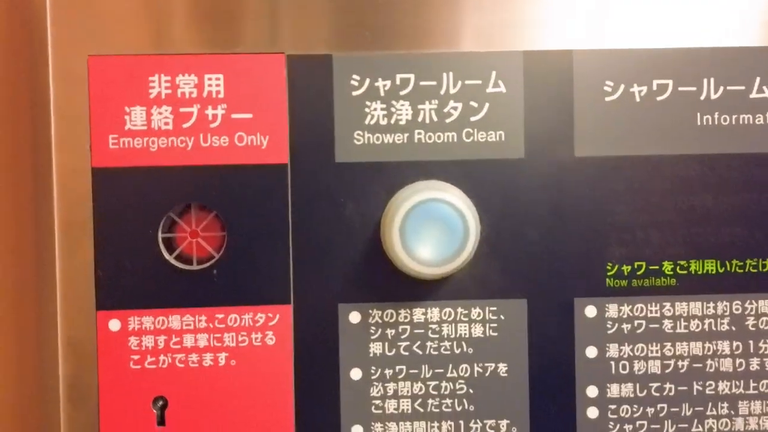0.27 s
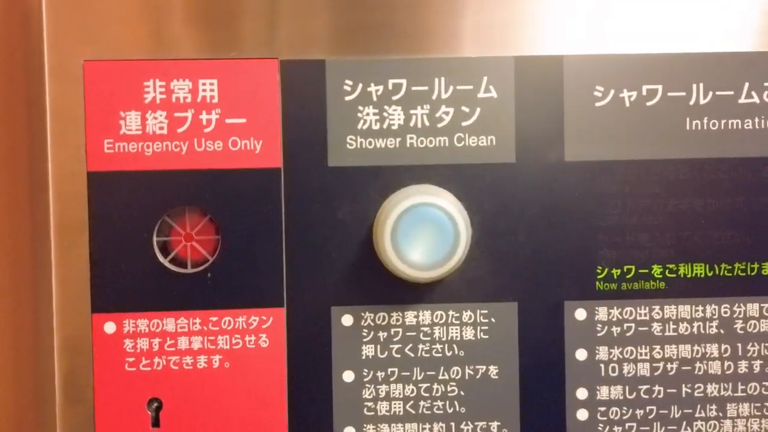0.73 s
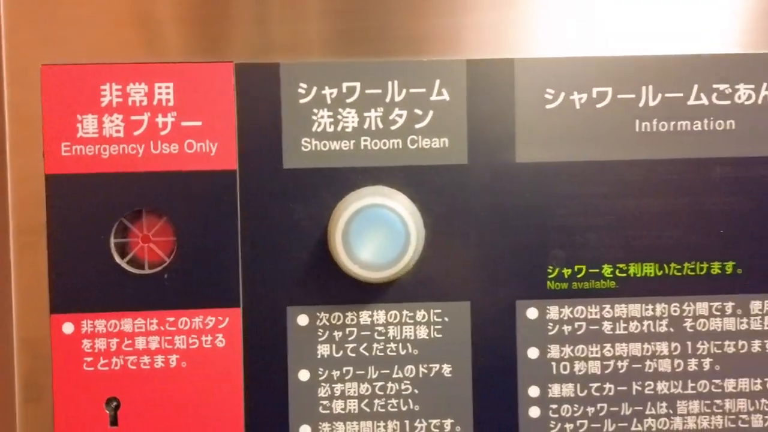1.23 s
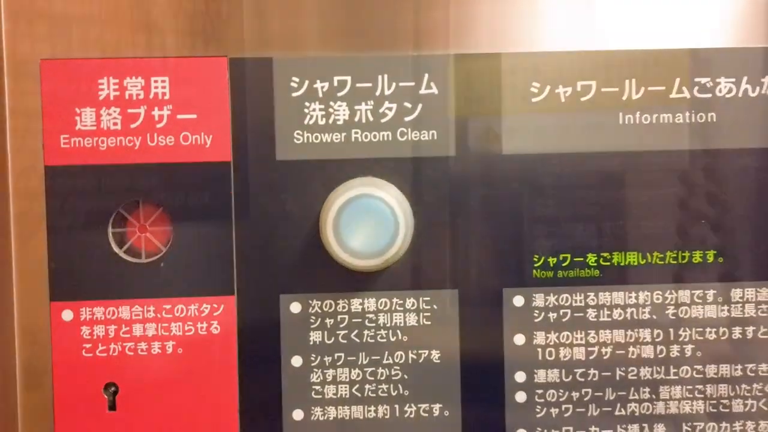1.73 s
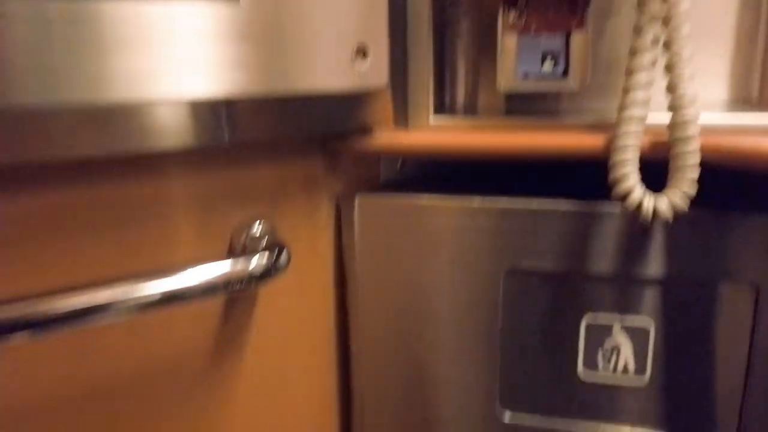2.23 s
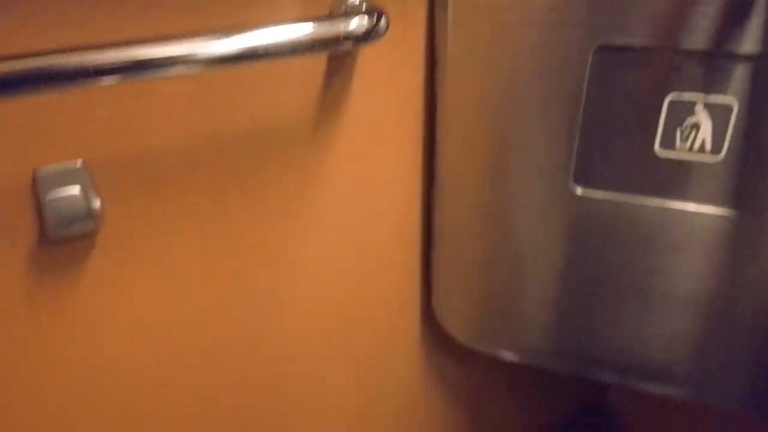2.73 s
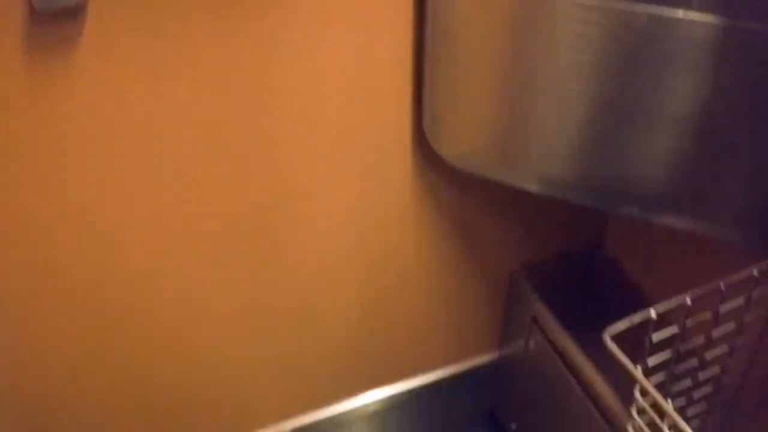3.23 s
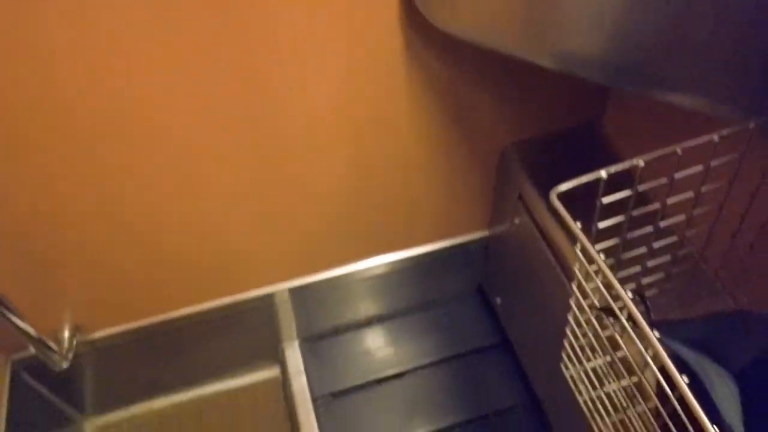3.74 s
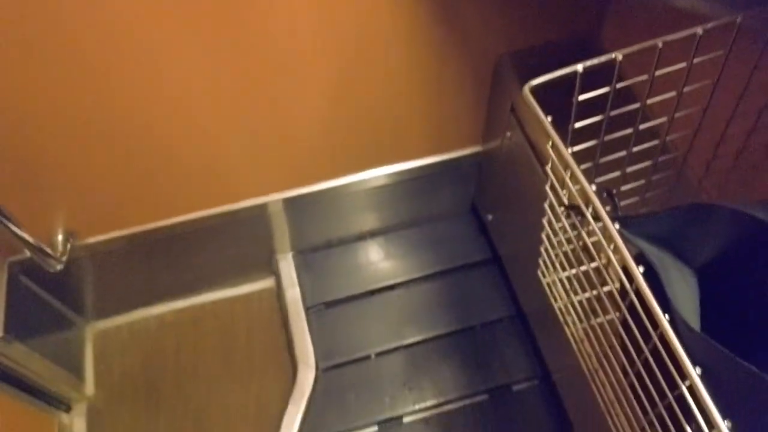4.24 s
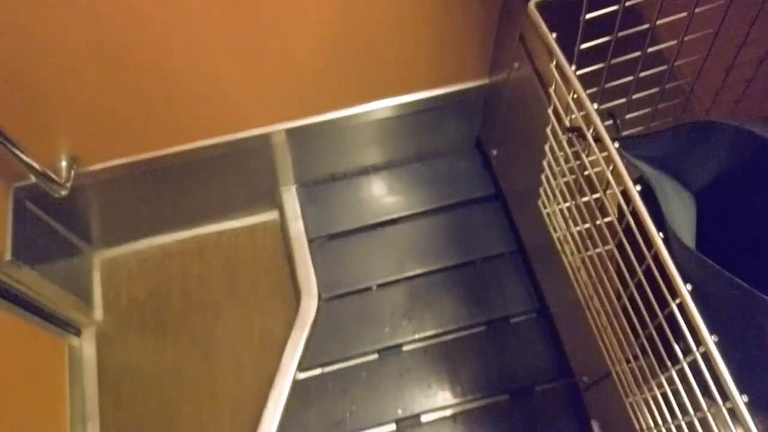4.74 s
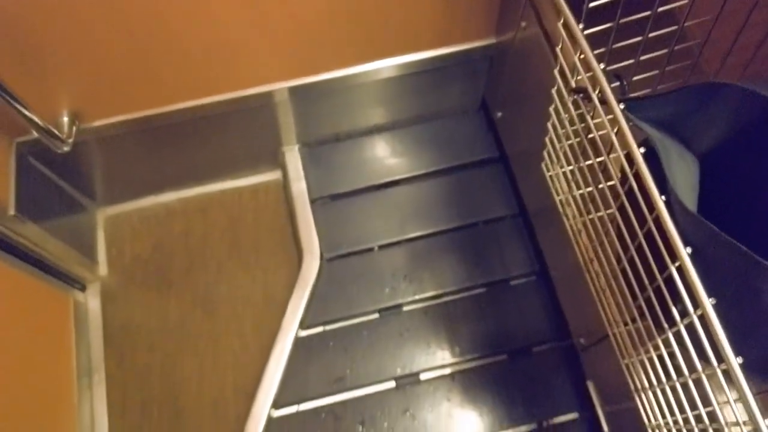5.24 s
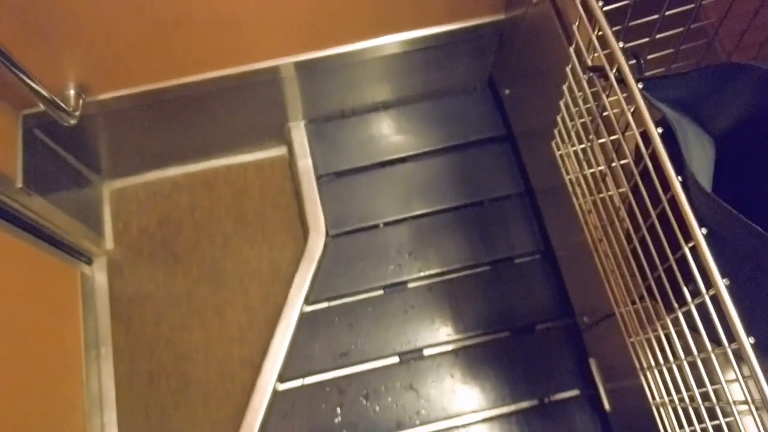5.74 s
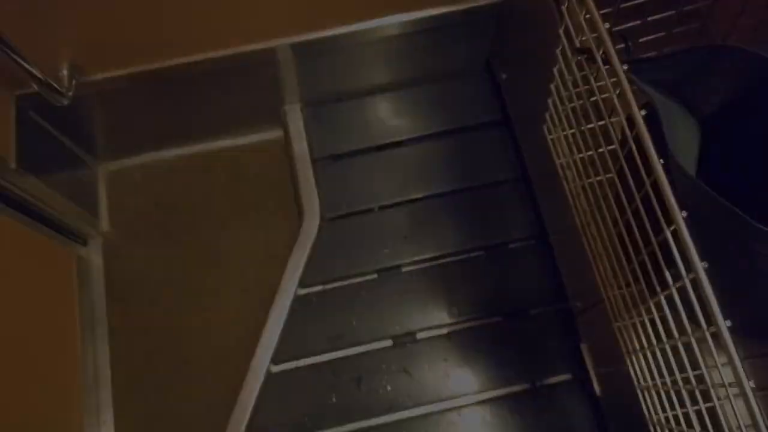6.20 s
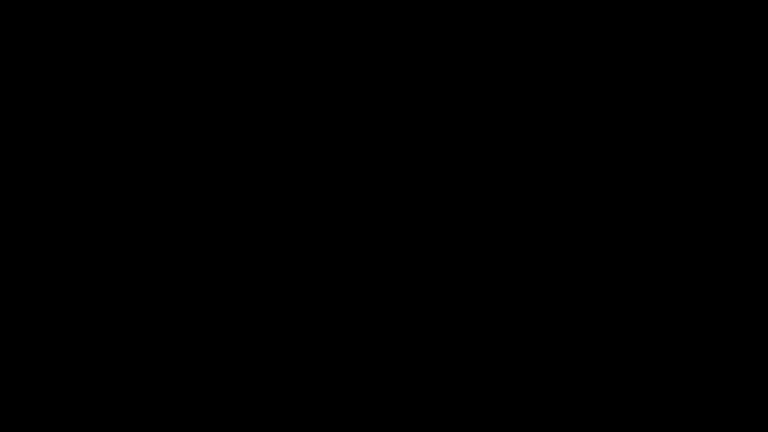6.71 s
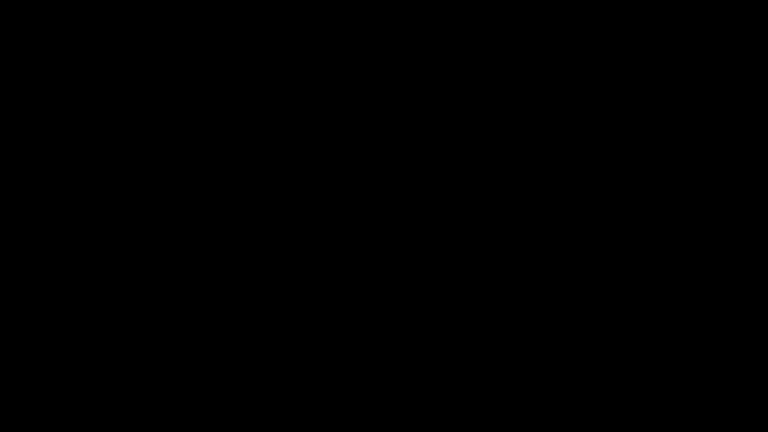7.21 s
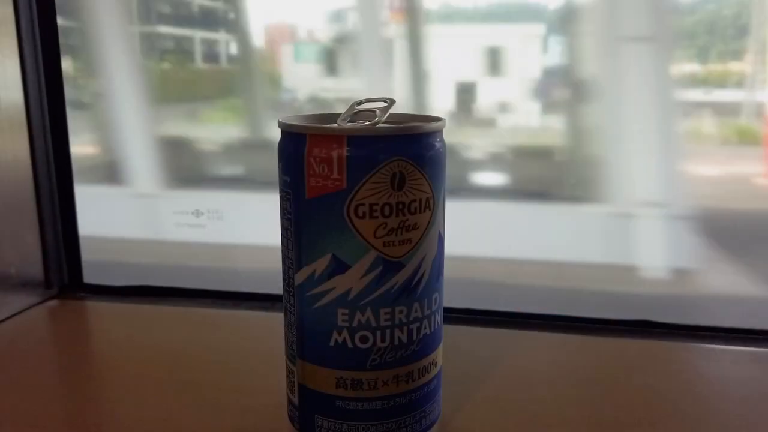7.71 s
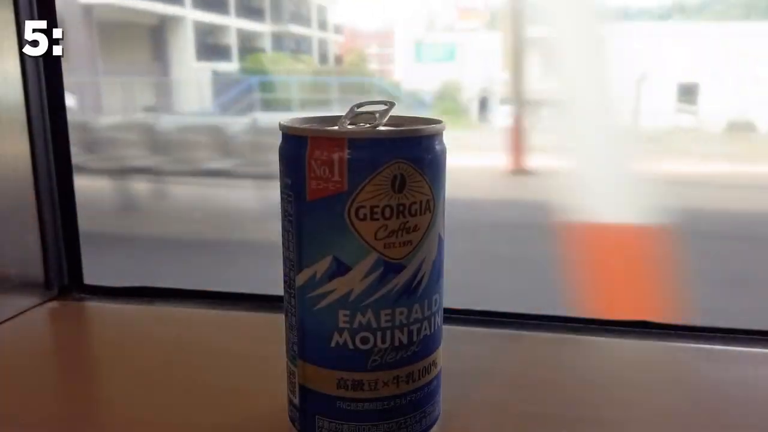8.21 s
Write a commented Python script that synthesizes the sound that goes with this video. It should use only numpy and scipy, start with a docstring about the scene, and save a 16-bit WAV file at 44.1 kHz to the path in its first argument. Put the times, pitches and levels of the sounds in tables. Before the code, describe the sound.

Shower jets hiss and splash over a train's rumble; after a silence, the train roars along while keyboard keys clack nearby.

```python
"""Jets hiss and drum behind a door over the carriage rumble: a train's shower room rinses itself. Then, from
the changing space, mist hisses and water splashes on the tray while the listener tilts down to the floor
grate; the spray fades out. After a silence the train runs on, heard from a window seat: wheels roar,
air rushes, the drive hums. A few keys clack on their stops close by, as on a keyboard."""
import sys
import numpy as np
from scipy import signal
from scipy.fft import rfft, irfft, next_fast_len
from scipy.io import wavfile
from scipy.ndimage import uniform_filter1d, map_coordinates

SR = 44100
rng = np.random.default_rng(int(sys.argv[2]) if len(sys.argv) > 2 else 0)


def to_wav(sig):
    """Store sig (one row per channel, or 1-D mono) as 16-bit WAV at the path in sys.argv[1].

    Samples outside -1..1 are clipped; the rate is SR.
    """
    pcm = np.clip(np.atleast_2d(sig), -1, 1) * 32767
    pcm = np.round(pcm).astype(np.int16)
    wavfile.write(sys.argv[1], SR, pcm.T)  # frames by channels


N = 373086
T = np.arange(N) / SR
DOOR_S, ROOM_S, RIDE_S = (0, 1.955), (1.955, 6.47), (7.2964, 9)
SIDE_SIGN = np.array([[1], [-1]])


def undb(db):
    """Decibels to gain."""
    return 10 ** (np.asarray(db) / 20)


def unit(x):
    """Scale to rms 1."""
    return x / np.sqrt(np.mean(x ** 2) + 1e-18)


def curves(table, t=T):
    """A table's columns, interpolated in time."""
    times, *columns = np.transpose(table)
    return [np.interp(t, times, column) for column in columns]


def during(span_s):
    """1 inside the span, with soft edges."""
    return uniform_filter1d(1. * ((T >= span_s[0]) & (T < span_s[1])), size=24)


def hump(x, centre, width):
    """Bell of height 1; width at half height."""
    return 2 ** -np.minimum((2 * (x - centre) / width) ** 2, 60)


def swells(table, t=T):
    """Summed bells of (peak_s, length_s, heights...) rows, one curve per height column."""
    peak_s, length_s, *columns = np.transpose(table)
    bells = hump(t[:, None], peak_s, length_s)
    return [bells @ heights for heights in columns]


def walk(rate_hz, t=T):
    """Smooth random wander, spread near 1."""
    return map_coordinates(rng.standard_normal(2048), [t * rate_hz], order=2, mode="wrap")


def colour_at(colour, hz):
    """A spectrum's dB at the given frequencies."""
    freq_hz, density_db = np.transpose(colour)
    return np.interp(np.log(hz + 1), np.log(freq_hz), density_db)


def noise(colour, n=N):
    """Noise with the given spectrum, rms 1."""
    size = next_fast_len(n)
    gain = undb(colour_at(colour, np.fft.rfftfreq(size, 1 / SR)))
    return unit(irfft(rfft(rng.standard_normal(n), size) * gain, size)[:n])


def level_band(db, hz, low_hz, high_hz):
    """Shift a spectrum so unit white noise through it has 0 dB in the band."""
    return db - 10 * np.log10(np.mean(undb(db) ** 2 * ((hz > low_hz) & (hz < high_hz)), axis=0))


def droplets(per_s, spread_db, mist_db):
    """Uneven drop impacts in smooth mist hiss: hz, frame times, short spectra of mid and side."""
    streams = []
    for _ in range(2):
        hits = rng.random(N) < per_s / SR
        sizes = undb(spread_db * np.minimum(rng.exponential(size=N), 6))
        impacts = unit(hits * sizes * rng.standard_normal(N))
        streams.append(unit(impacts + undb(mist_db) * rng.standard_normal(N)))
    hz, t, spectra = signal.stft(np.array(streams), SR, nperseg=2048)
    return hz[:, None], t, spectra


def water(drops, mid_db, side_db):
    """Shape the two drop streams into left and right."""
    mid, side = (signal.istft(z * undb(db), SR)[1][:N] for z, db in zip(drops, (mid_db, side_db)))
    return mid + SIDE_SIGN * side


def resonances(modes, hz):
    """dB that a body's modes add to the water's noise."""
    return sum(db * hump(hz, centre, width) for centre, width, db in modes)


def flutter(hz, t, rate_hz):
    """Jets break up unevenly: each octave wanders on its own."""
    octave = np.log2(hz + 1)
    return sum(np.sqrt(np.maximum(1 - abs(octave - k), 0)) * walk(rate_hz, t) for k in range(7, 15))


def wall_echoes(hz, t, wall_db, drift_s, rate_hz, count=10):
    """dB ripple from near walls; it shifts as the listener moves."""
    paths = 1
    for lag_s, phase in rng.uniform((.007, 0), (.024, 1), (count, 2)):
        cycles = hz * (lag_s + drift_s * walk(rate_hz, t)) + phase
        paths = paths + undb(wall_db) * np.exp(-2j * np.pi * cycles.astype(np.float32))
    power = abs(paths) ** 2 + 1  # the diffuse field fills the dips
    return 10 * np.log10(power / power.mean())


# water behind the door, mid and side: freq_hz, density_db
DOOR_MID_COLOUR = [(88, -42), (150, -17.5), (172, -6), (217, -10.5), (396, -11), (656, -8), (1000, -6.5),
                   (1350, -6), (2100, -4.5), (3220, -0.5), (4000, -3), (5030, -5), (7270, -1), (10500, -3),
                   (11600, -11.5), (15500, -18.5)]
DOOR_SIDE_COLOUR = [(88, -65), (150, -43), (643, -24), (695, -25.5), (966, -15), (1320, -22.5),
                    (1540, -9.5), (1830, -16), (3550, 1.5), (5030, -8.5), (5990, -2), (9180, -9.5),
                    (10100, -1), (15500, -26)]
# door panel resonances: centre_hz, width_hz, gain_db
PANEL_MODES = [(184, 30, 3), (258.6, 35, 7), (776, 60, 6), (1030, 170, 3.5), (1760, 220, 2.5)]
# jets sweeping past, here and in room_spray: peak_s, length_s, hiss_rise_db, spurt_rise_db
JET_SURGES = [(0.03, 0.12, 7.5, 7.5), (0.14, 0.075, 3, 6), (0.205, 0.095, 5, 3), (0.365, 0.057, 3.5, 0.5),
              (0.49, 0.12, 5, 6.5), (0.645, 0.05, 5.5, 5), (.71, 0.053, 3, 0.5), (0.805, 0.092, 4.5, 4.8),
              (.935, 0.069, 0.5, 4), (1.005, 0.12, 3.5, 5), (1.195, 0.048, 2.5, 2.5), (1.295, 0.17, 4.5, 4),
              (1.52, 0.096, 4, 5), (1.62, 0.034, 0, 4.5), (1.71, 0.17, 5, 4), (1.905, .055, 2, 1),
              (6.205, 0.087, 1, 5)]
# soft panel booms: peak_s, length_s, rise_db
PANEL_BOOMS = [(0.42, .1, 11), (0.66, 0.15, 14), (1.01, .1, 5.5), (1.29, .07, 8), (1.65, .08, 11)]


def door_jets(hiss_db=-36, drum_db=-45, blast_db=8, settle_s=0.23, flutter_db=1.1, width_db=-3):
    """Jets sweep the door's far side: a surging hiss over panel drumming that starts hard and settles."""
    hz, t, drops = droplets(per_s=5000, spread_db=1.5, mist_db=6)
    surge, spurt = swells(JET_SURGES, t)
    hiss = hiss_db + surge + (spurt - surge) * hump(hz, 3200, width=1800)
    boom = swells(PANEL_BOOMS, t)[0] * hump(hz, 400, width=190)
    drum = drum_db + 0.39 * spurt + boom + blast_db * np.exp(-t / settle_s)
    treble = 1 / (1 + (2200 / (hz + 1)) ** 4)
    colour = colour_at(DOOR_MID_COLOUR, hz) + resonances(PANEL_MODES, hz)
    bright, dull = level_band(colour, hz, 2500, 12000), level_band(colour, hz, 400, 2000)
    side_offset = level_band(colour_at(DOOR_SIDE_COLOUR, hz), hz, 2500, 12000) - bright
    mid_db = treble * (bright + hiss) + (1 - treble) * (dull + drum)
    mid_db += flutter_db * flutter(hz, t, rate_hz=28)
    mid_db += wall_echoes(hz, t, wall_db=-12.5, drift_s=0.00016, rate_hz=0.76)
    return water(drops, mid_db, mid_db + side_offset + width_db) * during(DOOR_S)


# floor rumble: freq_hz, density_db
RUMBLE_COLOUR = [(11, -33), (18, 1.5), (36, -5), (94, -10.5), (115, -12.5), (141, -31.5), (160, -20),
                 (210, -49), (350, -120)]
# rumble between jolts: time_s, level_db
RUMBLE_LEVEL = [(0, -44.5), (1.0, -46), (1.95, -48), (2.9, -46.5), (3.5, -56.5), (4.25, -49.5),
                (4.7, -56.5), (6.4, -56)]
# track jolts, here and in floor_bounces and ride: peak_s, length_s, rise_db, bounce_db, bounce_hz
TRACK_JOLTS = [(0.619, 0.11, -2, -32.5, 33.7), (0.871, .15, 9, -42, 28.2), (1.776, 0.07, 6, -33.5, 28),
               (6.411, 0.07, 12.5, -46.5, 37.4), (7.413, 0.11, -0.5, -23, 35.3), (8.272, 0.1, 1, -33, 48),
               (8.41, .08, 0, -27, 27)]


def carriage_rumble(door_db=1.5, room_db=-3, side_db=-1.5, sway_db=1, jolt_share=0.52):
    """The floor rumbles, harder at jolts: centred at the door, diffuse in the changing space."""
    mid, side = noise(RUMBLE_COLOUR), noise(RUMBLE_COLOUR)
    shake = undb(jolt_share * swells(TRACK_JOLTS)[0] + sway_db * walk(6.9))
    at_door = mid * undb(door_db) * during(DOOR_S)
    in_room = (mid + undb(side_db) * SIDE_SIGN * side) * undb(room_db) * during(ROOM_S)
    return undb(curves(RUMBLE_LEVEL)[0]) * shake * (at_door + in_room)


def floor_bounces():
    """At each jolt the floor swings for a few slow cycles."""
    swing = sum(-undb(db) * hump(T, peak_s, length_s) * np.cos(2 * np.pi * hz * (T - peak_s))
                for peak_s, length_s, _, db, hz in TRACK_JOLTS)
    return swing * (during(DOOR_S) + during(ROOM_S) + during(RIDE_S))


def splatter(shape, size=3):
    """Gouts land on ever new spots, briefly waking narrow modes; spread near 1."""
    patches = uniform_filter1d(rng.standard_normal(shape), size, axis=0)
    return size * uniform_filter1d(patches, size, axis=1)


# spray: time_s, hiss_db, splash_db
SPRAY_LEVELS = [(1.95, -38, -38.5), (2.1, -37, -37), (2.9, -37.5, -37.5), (3.6, -39, -39),
                (4.8, -40.5, -38), (5.5, -43, -39.5)]
# listener's aim: time_s, tilt (0 up, 1 at the floor)
LISTENER_TILT = [(2, 0.16), (3, 0.2), (4, 0.53), (4.8, 0.78), (5.4, 0.72), (6.4, 0.71)]
# spray with the aim up and at the grate, mid and side: freq_hz, density_db
UPPER_MID_COLOUR = [(53, -32), (90, -2), (248, 0), (282, -1.5), (328, -2.5), (415, -1.5), (639, -0.5),
                    (883, -3), (1450, -3), (1800, -3.5), (2330, -1.5), (4740, -11), (6840, -10.5),
                    (8120, -9), (15500, -11)]
UPPER_SIDE_COLOUR = [(76, -30.5), (130, 4), (644, 3), (1040, 2.5), (1550, 2.5), (2890, 0.5), (4220, -13),
                     (6050, -11.5), (8510, -9), (9400, -21), (10200, -17), (12400, -18.5), (15500, -15)]
GRATE_MID_COLOUR = [(45, -22), (80, -8.5), (160, -7), (270, -9), (350, -5.5), (480, -3), (590, -8.5),
                    (900, -3.5), (1500, -2), (1750, -2), (2100, -7.5), (3250, -9), (5300, -15.5),
                    (7000, -17.5), (8500, -9), (11500, -18), (15500, -10)]
GRATE_SIDE_COLOUR = [(53, -33), (90, -0.5), (222, -9), (389, -8), (434, -4), (550, -8), (1450, -5),
                     (2140, -5.5), (2830, 1), (5880, -22), (8300, -8.5), (9860, -4), (11500, -22),
                     (13600, -6), (15500, -27)]
# resonances of the tray under the grate: centre_hz, width_hz, gain_db
TRAY_MODES = [(696, 70, 5), (1056, 48, 2.6), (1510, 230, 4.7), (2200, 80, 3.5), (3160, 93, 3.5)]
# treble notch where two paths to the ear cancel: time_s, gain_db, centre_hz
PATH_NOTCH = [(2, -1.5, 11500), (4.8, 3, 11500), (5.4, -5, 11000), (5.8, -13, 11200), (6.12, -19.5, 11400),
              (6.25, 6, 10700)]
# hollowness and sheen around the fade: peak_s, length_s, centre_hz, width_hz, gain_db
FADE_TINTS = [(6.3, 0.26, 2900, 2500, -6), (6.2, 0.38, 7900, 1400, 3.5), (7.1, .16, 470, 290, 7)]


def room_spray(hiss_db=0.37, splash_db=-1, flutter_db=0.86, splatter_db=2,
               width_db=-9, grate_width_db=6.5, fade_start_s=6.252, fade_db_per_s=136):
    """Mist hisses and water splashes on the tray, whose hollow ring grows as the listener tilts down."""
    hz, t, drops = droplets(per_s=7000, spread_db=2, mist_db=4.5)
    fade = fade_db_per_s * np.maximum(t - fade_start_s, 0)
    hiss, splash = np.add(curves(SPRAY_LEVELS, t), swells(JET_SURGES, t)) - fade
    tilt, = curves(LISTENER_TILT, t)
    notch_db, notch_hz = curves(PATH_NOTCH, t)
    sheen = 0.11 * hump(hz, 0.65 * notch_hz, width=1300)  # below the notch the two paths add
    notch = notch_db * (hump(hz, notch_hz, width=2000) - sheen)
    grate = colour_at(GRATE_MID_COLOUR, hz) + resonances(TRAY_MODES, hz)
    colour = (1 - tilt) * colour_at(UPPER_MID_COLOUR, hz) + tilt * grate + notch
    side = (1 - tilt) * colour_at(UPPER_SIDE_COLOUR, hz) + tilt * colour_at(GRATE_SIDE_COLOUR, hz)
    bright, dull = level_band(colour, hz, 4000, 15500), level_band(colour, hz, 200, 3000)
    side_offset = level_band(side + notch, hz, 4000, 15500) - bright
    treble = 1 / (1 + (3500 / (hz + 1)) ** 4)
    mid_db = treble * (bright + hiss + hiss_db) + (1 - treble) * (dull + splash + splash_db)
    mid_db += flutter_db * flutter(hz, t, rate_hz=20)
    mid_db += (1 - treble / 2) * wall_echoes(hz, t, wall_db=-9.5, drift_s=0.000707, rate_hz=2.5)
    mid_db += (1 - treble) * splatter_db * splatter(mid_db.shape)
    for peak_s, length_s, centre_hz, width_hz, gain_db in FADE_TINTS:
        mid_db += gain_db * hump(t, peak_s, length_s) * hump(hz, centre_hz, width_hz)
    side_db = mid_db + side_offset + width_db + grate_width_db * tilt
    return water(drops, mid_db, side_db) * during(ROOM_S)


# wheel roar, air rush, cabin side signal: freq_hz, density_db
WHEEL_COLOUR = [(11, -32), (18, -3), (38, -0.5), (65, -4.5), (97, -7.5), (155, -8.5), (248, -6),
                (279, -4.5), (314, -5.5), (377, -9.5), (485, -17), (584, -17), (1000, -20.5), (1300, -23),
                (2200, -120)]
AIR_COLOUR = [(590, -39), (1000, -7.5), (1730, -8), (1840, -5), (1970, -10.5), (2420, -9), (4600, -29.5),
              (7700, -31.5), (11000, -29), (15500, -41)]
CABIN_SIDE_COLOUR = [(15, -48), (25, -17.5), (96, -0.5), (204, -13), (281, 5), (410, -7), (552, -6),
                     (666, -13), (782, -13), (945, -9), (1850, -8), (3170, -14), (5580, -35.5),
                     (11800, -29), (15500, -50)]


def wheels_and_air(jolt_db, wheel_db=-29, air_db=-44, side_db=-45, flicker_db=0.7):
    """Wheels roar through the floor, swelling at bumps; air rushes almost evenly past the window."""
    wheels, air, side = noise(WHEEL_COLOUR), noise(AIR_COLOUR), noise(CABIN_SIDE_COLOUR)
    mid = wheels * undb(wheel_db + jolt_db) + air * undb(air_db - flicker_db * walk(8))
    return mid + undb(side_db) * SIDE_SIGN * side


# drive hum: shaft_multiple, level_db
HUM_LINES = [(1, -8), (3, -5.5), (4, -9), (5, -11), (7, -10.5), (8, -8)]
# its two strongest lines come and go: time_s, level_db
LOWER_DRONE = [(7.3, -36), (7.514, -48), (7.552, -40), (7.79, -41), (7.972, -29), (8.022, -50),
               (8.232, -28), (8.296, -28), (8.35, -46), (8.45, -38)]
UPPER_DRONE = [(7.3, -32), (7.456, -22), (7.562, -45), (7.604, -25), (7.674, -50), (7.7, -33), (7.748, -47),
               (7.792, -28), (7.886, -38), (7.904, -35), (8.058, -26.5), (8.088, -46), (8.16, -32),
               (8.222, -43), (8.276, -24), (8.45, -43)]


def drive_hum(jolt_db, shaft_hz=46.57, drift=0.01097, hum_db=-37, waver_db=5, rough_db=1.5):
    """The drive hums through the floor in wavering multiples of the shaft rate."""
    lines = [(multiple, db + hum_db + jolt_db + waver_db * walk(16)) for multiple, db in HUM_LINES]
    for multiple, levels, trim_db in ((2, LOWER_DRONE, 0), (6, UPPER_DRONE, -0.9)):
        lines.append((multiple, curves(levels)[0] + trim_db + rough_db * walk(60)))
    hum = np.zeros(N)
    for multiple, level_db in lines:
        turns = np.cumsum(shaft_hz * (1 + drift * walk(14))) / SR
        hum += undb(level_db) * np.sin(2 * np.pi * multiple * turns)
    return hum


def decay(level_db, t, t60_s):
    """Gain that falls 60 dB per t60_s from level_db."""
    return undb(level_db - 60 * t / t60_s)


def ride(click_db=-17, click_t60_s=0.017):
    """The running train cuts in abruptly as the scene changes; a small click marks the change."""
    jolt_db = swells(TRACK_JOLTS)[0]
    cabin = wheels_and_air(jolt_db) + drive_hum(jolt_db)
    since_s = T - RIDE_S[0]
    click = (since_s >= 0) * decay(click_db, np.clip(since_s, 0, 3 * click_t60_s), click_t60_s)
    return cabin * during(RIDE_S) + click


# swish: freq_hz, density_db
AIR_SWISH_COLOUR = [(5000, -25), (9500, 0), (12000, 0), (15500, -8)]


def air_swish(peak_s=7.445, length_s=0.15, level_db=-61):
    """A thin, high swish swells and fades in the air outside the window."""
    return undb(level_db) * hump(T, peak_s, length_s) * noise(AIR_SWISH_COLOUR) * during(RIDE_S)


def add(track, start_s, sound):
    """Mix a sound in at a time."""
    i = int(start_s * SR)
    track[i:i + len(sound)] += sound[:max(N - i, 0)]


# keys hitting their stops, here and in slider_ticks; cap_ring_factor is small if the finger stays on:
# stop_s, clack_db, pitch_hz, travel_s, tick_db, case_ring_db, cap_ring_factor
KEYSTROKES = [(7.717, 4, 2230, 0.011, -15, -16, 1.3), (7.8286, -7.5, 2430, 0.0022, -31.5, -2, 1.2),
              (7.8306, -16, 2400, 0.0013, -38, -6, 1.0), (7.9496, 4.5, 2090, 0.005, -9, 4.5, 1.05),
              (8.0153, -4.5, 2380, 0.0018, -17.5, 3, .65), (8.0207, -11, 2500, 0.0028, -34, 0, .6),
              (8.1161, -8.5, 3100, 0.0016, -31, 0, 1.2), (8.119, -17, 2900, .001, -24, 0, 1.0),
              (8.1276, -5, 2230, .0104, -10.5, 8, .75), (8.1971, -10, 3020, 0.0035, -24.5, -1, 1.4),
              (8.1994, -7, 2120, 0.0015, -28, 14, 1.5), (8.2821, -1.5, 2240, 0.016, -15.5, 2, .85),
              (8.3885, -8, 2340, 0.0011, -48, -1, 4), (8.4101, 2.5, 2280, 0.01, -13, -4, .7)]
# key cap modes: pitch_ratio, level_db, t60_s
CAP_MODES = [(.64, -10, 0.005), (.94, 9, 0.0049), (1.13, 5.5, 0.0042), (1.52, -8, .005),
             (1.95, -1.5, 0.0019)]
# keyboard case modes: freq_hz, level_db, t60_s
KEYBOARD_MODES = [(1050, 0, 0.021), (1370, 11, 0.023), (2206, 7, 0.048), (2530, -17, 0.021),
                  (2965, 7, 0.015), (3320, 9, 0.023), (4140, -2, 0.037)]
# case rattle: freq_hz, density_db
RATTLE_COLOUR = [(500, -10), (1300, 2), (2250, 11.5), (3300, -4), (5500, -15), (10000, -12), (15000, -33)]


def key_clacks(gain_db=-4, case_db=-27, rattle_db=-23, rattle_t60_s=0.12, contact_hz=4500):
    """Each cap clacks on its stop; the case rings and rattles briefly."""
    track, t = np.zeros(N), T[:SR // 8]
    for stop_s, clack_db, pitch_hz, _, _, case_ring_db, cap_ring_factor in KEYSTROKES:
        # neighbouring modes swing against each other: the clack takes a cycle to build
        cap = sum((-1) ** k * decay(db, t, t60_s * cap_ring_factor)
                  * np.sin(2 * np.pi * pitch_hz * ratio * t)
                  for k, (ratio, db, t60_s) in enumerate(CAP_MODES))
        case = np.zeros(len(t))
        for freq_hz, db, t60_s in KEYBOARD_MODES:  # each key's spot wakes the case differently
            envelope = decay(db + 3.2 * rng.standard_normal(), t, t60_s)
            mode_hz = freq_hz * (1 + 0.036 * rng.standard_normal())
            case += envelope * np.sin(2 * np.pi * (mode_hz * t + rng.random()))
        rattle = noise(RATTLE_COLOUR, len(t)) * decay(rattle_db, t, rattle_t60_s)
        knock = cap / abs(cap).max() + undb(case_db + case_ring_db) * case + rattle
        # a gentle stroke wakes little but the main mode; a hard one is broad
        width_hz = min(contact_hz * undb(0.93 * clack_db), SR / 4)
        knock = signal.lfilter(*signal.iirpeak(pitch_hz, pitch_hz / width_hz, fs=SR), knock)
        add(track, stop_s, undb(clack_db + gain_db) * knock / abs(knock).max())
    return track


# fingertip and slider ticks: freq_hz, density_db
SLIDER_COLOUR = [(800, -0.5), (2400, 8), (4000, 1), (6500, -2.5), (9300, 1), (10000, 5.5), (10800, -4),
                 (12000, -2.5), (15500, -6)]


def slider_ticks(gain_db=-6, fingertip_db=-4, lead_in_db=-15, tail_db=-21, travel_left=0.42, lead_s=0.02):
    """The fingertip lands, then the slider lets go; a faint hiss swells just before each tick."""
    track, t = np.zeros(N), T[:SR // 8] - lead_s
    lead_in = decay(lead_in_db, abs(t), t60_s=0.012)
    tick = decay(0, abs(t), t60_s=0.018) + decay(tail_db, abs(t), t60_s=0.12)
    envelope = np.where(t < 0, lead_in, tick)
    for share, trim_db in ((1, fingertip_db), (travel_left, 0)):
        for stop_s, _, _, travel_s, tick_db, _, _ in KEYSTROKES:
            sound = undb(tick_db + trim_db + gain_db) * envelope * noise(SLIDER_COLOUR, len(t))
            add(track, stop_s - share * travel_s - lead_s, sound)
    return track


def scene():
    """Shower, silence, ride; the keys are dry and dead centre."""
    shower = door_jets() + room_spray()
    train = carriage_rumble() + floor_bounces() + ride() + air_swish()
    return shower + train + key_clacks() + slider_ticks()


def record(dry, top_hz=15850):
    """Full scale clips the hardest clacks; the top is cut."""
    lowpass = signal.ellip(10, .2, 80, top_hz, fs=SR, output="sos")
    return signal.sosfilt(lowpass, np.clip(dry, -1, 1))


dry = scene()
out = record(dry)
to_wav(out)
```